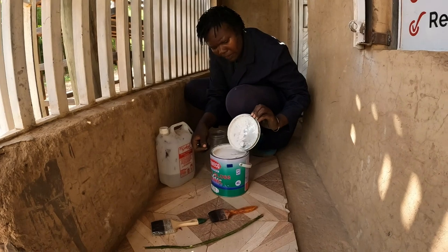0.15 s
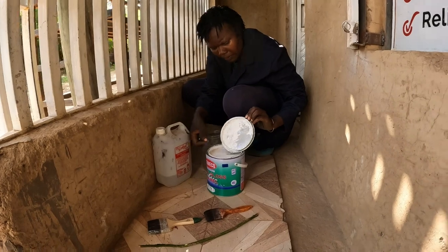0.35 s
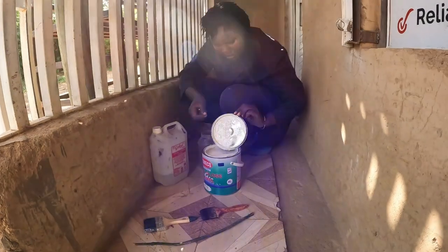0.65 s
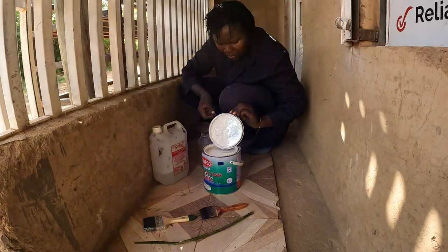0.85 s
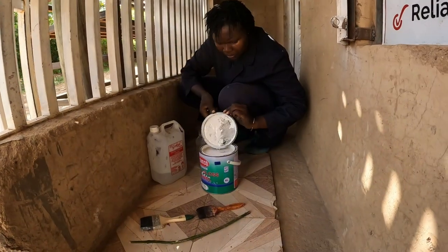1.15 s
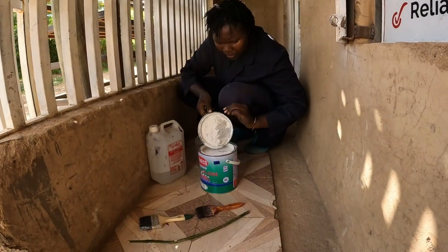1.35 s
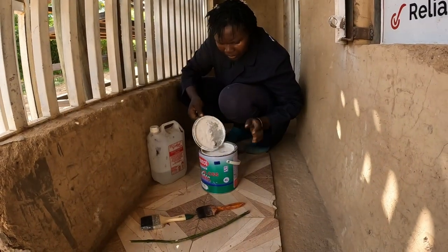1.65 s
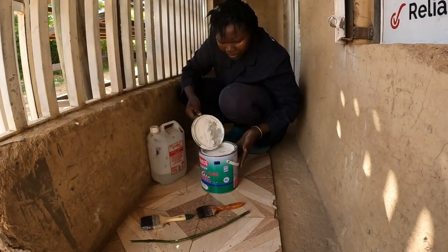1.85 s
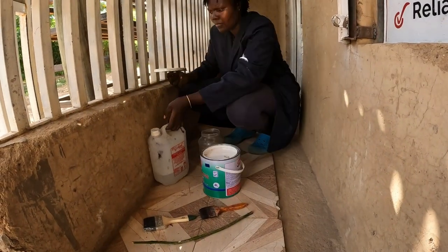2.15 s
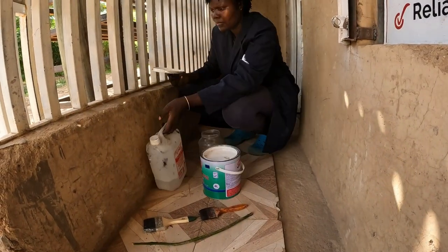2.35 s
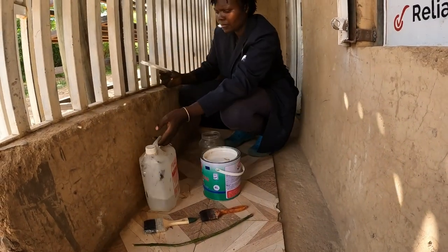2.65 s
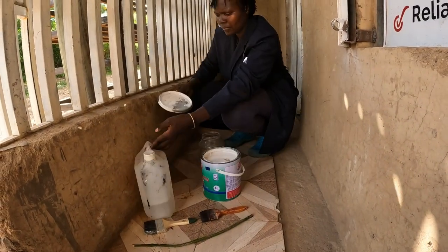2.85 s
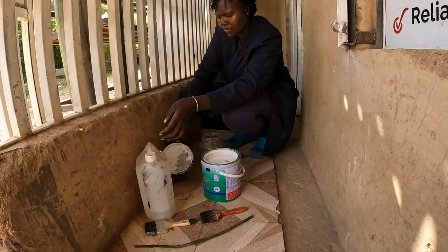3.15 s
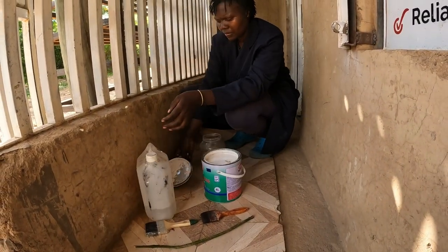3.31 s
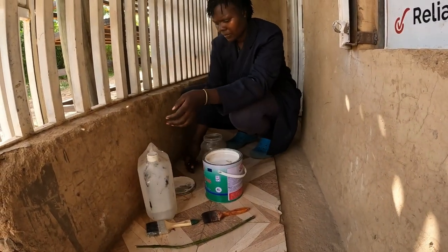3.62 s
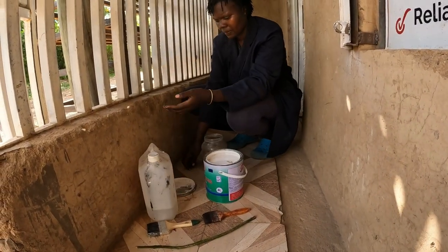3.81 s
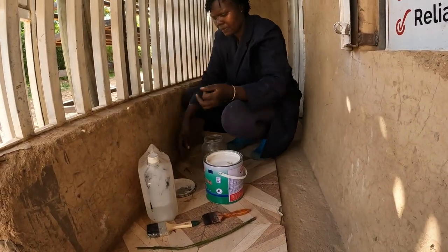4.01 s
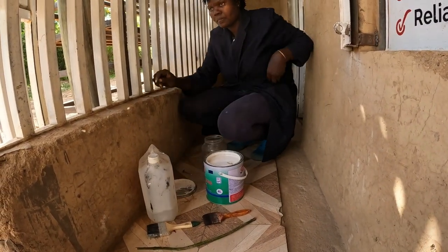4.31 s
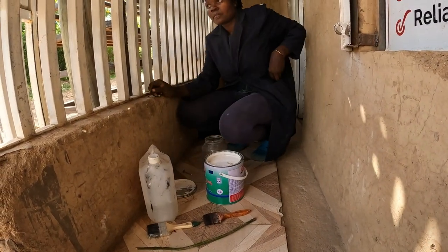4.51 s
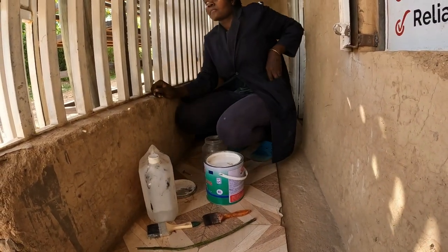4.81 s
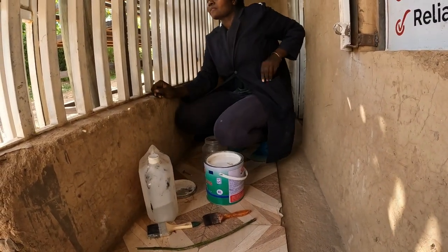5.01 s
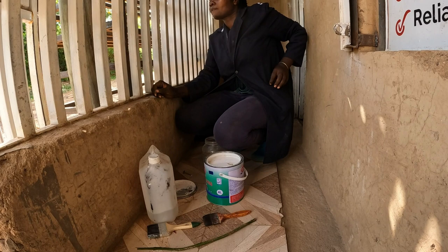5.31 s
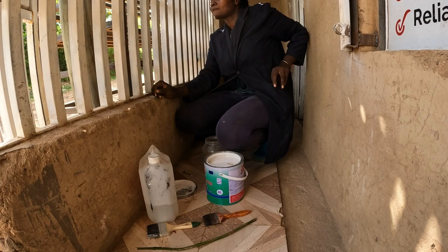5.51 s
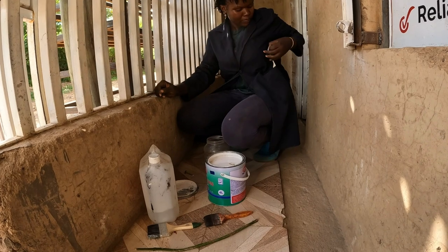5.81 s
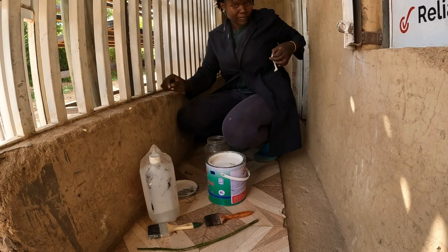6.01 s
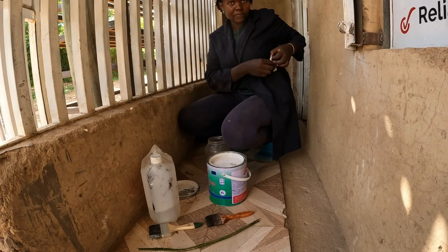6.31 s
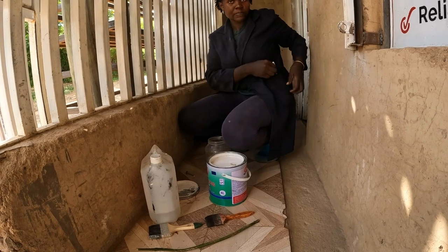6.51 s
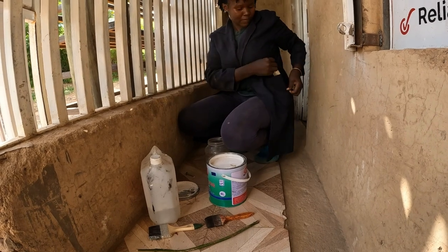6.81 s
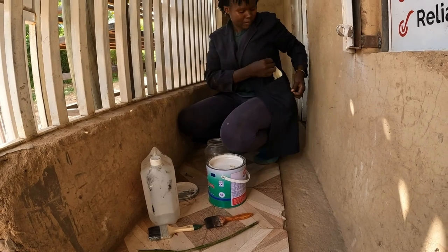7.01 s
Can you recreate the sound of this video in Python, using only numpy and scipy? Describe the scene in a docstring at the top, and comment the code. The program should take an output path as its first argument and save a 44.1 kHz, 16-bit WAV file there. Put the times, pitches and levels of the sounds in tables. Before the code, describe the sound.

Over a low, throbbing engine idle outside, a thin metal lid rings against its tin, with finger rubs and light ticks, and comes away in sharp clanks. A part-filled plastic container skids and booms, the lid drops with a ringing rattle, and bangles tinkle. The later part is quieter: cloth swishes, small knocks and creaks, faint birds. Close pickup, short semi-open room tail.

```python
"""A paint tin's metal lid clangs free close to the microphones on a narrow veranda, later clattering on the floor:
each blow is damped modes plus noise bursts. Between, a plastic jerrycan drags in stick-slip bursts and booms.
Bangles clink as paired sine modes; fingers and clothes rustle as swelling, grainy noise.
Outside, an engine idles as low harmonics and rumble, birds whistle in gliding tones,
an insect trills in narrow-band noise, and a soft wash of distant sound lies behind."""
import sys
import numpy as np
from scipy import signal
from scipy.fft import rfft, irfft, next_fast_len
from scipy.io import wavfile

SR = 44100
rng = np.random.default_rng(int(sys.argv[2]) if len(sys.argv) > 2 else 0)


def wav_out(sig):
    """Save sig, one row per channel (or a flat mono array), as 16-bit PCM at SR to the path in sys.argv[1]."""
    wavfile.write(sys.argv[1], SR, np.round(np.clip(np.atleast_2d(sig).T, -1, 1) * 32767).astype(np.int16))


N = 315742
T = np.arange(N) / SR
AGE = T[:SR * 3 // 4]  # time since the onset of a short sound, s

# Two close microphone ports.
# likeness of the ports: (f/Hz, correlation/1)
PORT_LIKENESS = [(100, 1), (250, .997), (500, .96), (1000, .9), (2400, .78), (6000, .8), (14000, .6)]
# left against right: (f/Hz, level/dB)
PORT_LEAN = [(60, 0.0), (130, 0.0), (290, 0.5), (640, 1.0), (1410, 0.5), (3100, -0.5), (6820, 0.5),
             (15000, 3.5)]
# left against right: (f/Hz, phase/rad)
PORT_LEAD = [(60, 0), (250, -.08), (550, -.3), (1100, -.5), (2070, -.6), (3000, -.35), (4300, -.5),
             (6000, -.2), (11500, 0)]
EDGE_HZ = 15600  # upper band limit
# air moving at the ports: (f/Hz, level/dB)
DRAUGHT = [(12, 0), (30, -2), (60, -9), (120, -17), (300, -34), (1000, -70)]
DRAUGHT_DB = -57

# Outside, beyond the veranda.
# distant wash: (f/Hz, level/dB)
AIR = [(100, 9), (170, 10.5), (260, 0.5), (350, 1.5), (450, -5), (600, -8.5), (800, -12), (1080, -6),
       (1600, -11.5), (2500, -18), (4100, -20), (5200, -18), (7400, -26.5), (9000, -34), (12000, -35),
       (15500, -54)]
WASH_DB, LULL_S, LULL_LENGTH_S, LULL_DB = -39.8, 6.25, 1.5, -5.5  # lull: peak time, length, change
# idling engine: (t/s, rate/firings per s)
ENGINE_SPEED = [(0, 15.3), (.8, 15.9), (1.25, 15.3), (2.1, 17.5), (2.4, 16.9), (2.75, 14.9), (3.45, 16.5),
                (4.35, 17.6), (5.1, 16.95), (5.6, 16.9), (6.85, 18.1), (7.16, 17.6)]
# its throb: (t/s, level/dB)
THROB = [(0, -31), (.25, -28), (.9, -27), (1.7, -26), (2.0, -34), (2.4, -25), (2.8, -24), (3.1, -27.5),
         (3.45, -26), (4.1, -29), (5.05, -23.5), (6.05, -33.5), (6.85, -29), (7.16, -30)]
# its low orders: (multiple of the firing rate/1, level/dB)
ENGINE_ORDERS = [(2, -4), (3, -16), (4, -1), (6, 0), (7, -17), (8, -19), (10, -17)]
# rumble between the orders: (f/Hz, level/dB)
RUMBLE = [(15, -18), (30, -14), (45, -13), (60, -3), (80, 0), (100, -2), (120, -16), (200, -26), (500, -60),
          (3000, -100)]
BOOM_DB, BOOM_HZ, BOOM_WIDTH_HZ = 3.5, 84.5, 9  # the exhaust's strongest order crosses a resonance
SETTLES_S, SETTLING_S = 2.4, 1.1  # midpoint and duration of the engine settling
UNEVEN_DB, SETTLED_DB = -2, -6.5  # rumble before and after
RAGGED_DB, SMOOTH_DB = -6, -4.5  # orders before and after
# insect's narrow band: (f/Hz, level/dB)
TRILL_BAND = [(8000, -50), (9300, -8), (9650, 0), (10000, -7), (11000, -50)]
TRILL_S, TRILL_LENGTH_S, TRILL_DB = 2.5, 2.1, -61  # peak time, length, level
# rising bird whistles: (t/s, length/s, start f/Hz, level/dB)
WHISTLES = [(2.39, .12, 6150, -49), (2.61, .1, 7100, -53), (3.11, .12, 6700, -54), (4.75, .11, 10000, -59),
            (5.63, .26, 6100, -54), (6.21, .11, 7200, -63)]
RISE_HZ_PER_S = 7000
# second bird's runs: (t/s, chips/count, level/dB)
CHIP_RUNS = [(4.8, 1, -52), (6.005, 3, -55), (6.295, 3, -56), (7.07, 2, -55)]
CHIP_S, CHIP_SPACING_S = .052, .052  # length, and time from onset to onset
CHIP_HZ, CHIP_FALL_HZ = 5480, 400
# one held whistle: (t/s, length/s, start f/Hz, end f/Hz, level/dB)
LONG_NOTE = (5.87, .46, 2110, 2095, -56)

# Near the microphones.
# rubbed cloth: (f/Hz, level/dB)
CLOTH = [(200, -8), (700, -6), (1400, 1), (2400, -4), (4000, -3), (5500, 0), (7800, -3), (9200, -8),
         (11500, -13), (15000, -26)]
# cloth shifting with the body: (t/s at the fastest point, length/s, level/dB)
SHIFTS = [(3.24, .36, -48.5), (4.425, .055, -35), (4.66, .26, -50.5), (4.905, .09, -44.5),
          (4.997, .045, -42), (5.25, .16, -56), (5.5, .12, -55), (5.73, .13, -50), (6.04, .2, -53),
          (6.46, .1, -54), (6.62, .06, -49), (6.745, .07, -46), (6.9, .06, -45), (7.03, .07, -52)]
# fingers sliding over the lid: (t/s at the fastest point, length/s, level/dB)
SLIDES = [(.06, .17, -37), (.225, .06, -40), (.3, .1, -46), (.54, .16, -47.5), (.69, .15, -43),
          (.945, .1, -37), (1.07, .14, -48), (1.3, .08, -37), (1.405, .07, -34), (1.63, .2, -54),
          (2.18, .05, -43)]
SHIFT_TILT_DB, SLIDE_TILT_DB = -.9, .5  # per octave: the fingers are brighter than the clothes
STIR_DB, STIR_SWAY_DB = -67, 3  # cloth never quite comes to rest
# dull knocks and creaks as weight shifts: (t/s, level/dB, time to fall 20 dB/s)
KNOCKS = [(4.728, -21, .011), (4.751, -25, .012), (4.781, -30, .014), (4.809, -30, .01), (4.817, -32, .016),
          (6.597, -39, .12), (6.706, -37, .1), (6.899, -29.5, .022)]
# their spectrum: (f/Hz, level/dB)
KNOCK = [(200, -14), (500, -13), (750, -9), (1020, 2), (1400, -9), (2300, -20), (3600, -18), (6000, -30),
         (14000, -50)]
# small ticks of handling: (t/s, level/dB, tilt/dB per octave, time to fall 20 dB/s)
TICKS = [(0.1, -32, 1, .015), (0.225, -33, 5, .03), (0.991, -25, 1, .014), (1.026, -36, -1, .008),
         (1.126, -24, 0, .012), (1.202, -26.5, -1, .012), (4.107, -35, 0, .01), (4.406, -33, -1, .04),
         (4.728, -33, -3, .01), (6.487, -48, 2, .012)]
# bangle blows: (t/s, ring level/dB, tick level/dB, second ring against the first/dB)
CLINKS = [(3.938, -26, -28, -12), (4.002, -32, -18, 1), (4.088, -31.5, -19, 10.5), (4.137, -37, -26, 8),
          (4.157, -41, -38, 10)]
# modes of each of two bangles: (f/Hz, level/dB, t60/s)
BANGLES = [
    [(4200, 0, .18), (6780, 0, .08), (8340, -7, .15), (13380, -13, .08)],
    [(4150, -12, .1), (6900, -14, .13), (7900, 0, .07), (8010, -5, .11), (13600, -14, .09)],
]
# pulls on the jerrycan: (t/s at the fastest point, length/s, level/dB)
PULLS = [(2.57, .11, -35), (2.74, .05, -22), (2.88, .14, -20)]
# jerrycan catching and skidding: (t/s, boom level/dB, grit level/dB, grit time to fall 20 dB/s)
SKIDS = [(2.511, -27, -18, .035), (2.544, -28, -26, .04), (2.56, -28, -27, .04), (2.592, -27, -33, .05),
         (2.616, -30, -31, .04), (2.703, -21, -30, .04), (2.711, -9, -8.5, .045), (2.733, -14, -13, .04),
         (2.76, -21, -25, .07), (2.794, -20, -22, .075), (2.836, -20, -18.5, .06), (2.884, -10, -17, .08),
         (2.914, -11.5, -12, .055), (2.93, -13, -21, .05), (2.968, -24, -25, .035), (2.994, -26, -25, .025)]
# its hollow plastic body: (f/Hz, level/dB, t60/s)
CAN_MODES = [(146, -6, .2), (180, -10, .15), (212, -6, .15), (243, -8, .12), (270, 0, .15), (295, -4, .15),
             (335, -8, .13), (410, -12, .1), (555, -10, .12)]
# plastic slipping on grit: (f/Hz, level/dB)
GRIT = [(70, -6), (110, 6), (160, 8), (300, 9), (420, 1), (560, 4), (750, -3), (1300, 0), (1900, -6),
        (4500, -7), (8000, -11), (12000, -20.5), (15000, -38)]
# lid rim sliding over the tin: (t/s at the fastest point, length/s, level/dB)
SCRAPES = [(.25, .14, -38), (.68, .5, -47), (1.04, .12, -43), (1.32, .5, -48)]
# struck sheet metal, buzzing: (f/Hz, level/dB)
CLATTER = [(200, -26), (500, -19), (820, -15), (1100, -1), (1600, 0), (2100, -4), (2550, -2), (3200, -7),
           (4200, -6), (7000, -13), (11000, -26), (15000, -43)]
# its first sharp contact: (f/Hz, level/dB)
CRACK = [(200, -14), (700, -8), (1300, 0), (3000, -4), (7500, -5), (11000, -15), (15000, -30)]
# its hollow thump: (f/Hz, level/dB)
THUMP = [(50, -20), (110, -4), (220, 0), (290, -3), (400, -20), (900, -40), (4000, -80)]
# loose lid on the floor: (t/s, ring level/dB, clatter level/dB, brightness/dB per octave,
# base time to fall 20 dB/s, crack level/dB, thump level/dB)
LID_HITS = [(3.5, -17, -24, -3.5, .225, -8, -28), (3.602, -34, -20, 5, .07, -27, -50),
            (3.662, -29, -13, 1.5, .08, -10, -42), (3.706, -28, -15.5, .8, .12, -24, -50)]
# its modes before brightening: (f/Hz, level/dB)
LID_MODES = [(662, -8), (759, -9), (791, -9), (899, -9), (1063, -7), (1133, -7), (1182, -7), (1219, 2),
             (1553, -5), (1868, -6), (2417, -10), (2972, -9), (3558, -10), (3615, -13), (3768, -12),
             (3900, -13), (4094, -12), (4266, -9), (4309, -13), (4616, -15), (5214, -14), (5284, -16)]
# lid against tin: (t/s, ring level/dB, clatter level/dB, brightness/dB per octave,
# base time to fall 20 dB/s, crack level/dB, thump level/dB)
TIN_HITS = [(0.0, -16, -16, -4.2, .135, -18, -28), (0.185, -42, -35, 4, .12, -45, -45),
            (0.992, -35, -43, -5, .15, -40, -31), (1.732, -18, -11.5, 1.7, .155, -11, -15),
            (1.947, -14, -16, -.6, .155, -12, -23), (2.119, -25, -15.5, 1.3, .014, -22, -38),
            (2.168, -46, -37, 0, .08, -60, -48), (2.272, -38, -45, -3, .04, -52, -34)]
# its modes before brightening: (f/Hz, level/dB)
TIN_MODES = [(665, -16), (848, -14), (899, -12), (1036, -5), (1069, -11), (1120, -9), (1249, -10),
             (1480, -11), (1513, -1), (1593, -4), (1628, -9), (1723, -6), (1771, -11), (2008, -12),
             (2398, -12), (2514, -13), (3147, -13), (3561, -9), (3679, -16), (3733, -15), (3959, -15),
             (3994, -15), (4046, -14), (4210, -16), (4261, -16), (4546, -14), (5192, -18), (5262, -19),
             (5631, -16), (5693, -19)]


def amp(db):
    """Decibels to gain."""
    return 10 ** (np.asarray(db) / 20)


def unit(x):
    """Scales to rms 1."""
    return x / np.sqrt(np.mean(x ** 2) + 1e-20)


def read(points, hz):
    """A spectrum table on a log-frequency axis."""
    f, value = np.transpose(points)
    return np.interp(np.log(hz + 1), np.log(f), value)


def curves(rows):
    """Each column of a time table, sample by sample."""
    s, *columns = np.transpose(rows)
    return [np.interp(T, s, c) for c in columns]


def add(mix, s, sound):
    """Lays a sound into the mix at time s."""
    part = mix[max(round(s * SR), 0):][:len(sound)]
    part += sound[:len(part)]


def drift(rate):
    """Random wander of rms 1 with rate new values a second, joined by straight lines."""
    knots = rng.standard_normal(N // 16)
    return unit(np.interp(T * rate, np.arange(len(knots)), knots))


def colour(x, spectrum):
    """Filters x by a spectrum, at rms 1."""
    size = next_fast_len(len(x))
    gain = amp(read(spectrum, np.fft.rfftfreq(size, 1 / SR)))
    return unit(irfft(rfft(x, size) * gain, size)[:len(x)])


def swells(rows, attack=.45, shape=2.0):
    """Gestures gather speed, peak and slow; attack is the rising share, a high shape holds longer."""
    attack, power = np.clip(attack, .05, .95), 0
    for s, length, db in rows:
        away = abs(T - s) / (length * np.where(T < s, attack, 1 - attack))
        power = power + amp(db) ** 2 * .5 ** (2 * np.minimum(away ** shape, 20))
    return np.sqrt(power)


def dying(length, hold=1, rise=.0005):
    """Envelope that falls 20 dB in length s; hold over 1 sustains it first, as a rattle does."""
    fall = amp(-20 * np.minimum((AGE / length) ** hold, 8))
    return fall * (1 - np.exp(-AGE / rise))


def ripple(hz, depth_db, width_hz=22):
    """Random peaks and gaps along the frequency axis, as crowded resonances make them."""
    knots = np.clip(rng.standard_normal(len(AGE)), -2, 2)
    return amp(depth_db * np.interp(hz / width_hz, np.arange(len(knots)), knots))


def burst(spectrum, length, tilt_db=0, hold=1, damping=0, rise=.0005, grain_db=0, ripple_db=0):
    """A crowd of modes too dense to count, in octave bands; damping makes the high ones die first."""
    hz, out = np.fft.rfftfreq(len(AGE), 1 / SR), 0
    octave = np.log2(np.clip(hz, 125, 16000) / 1000)
    shape = amp(read(spectrum, hz) + tilt_db * octave) * ripple(hz, ripple_db)
    phases = np.exp(2j * np.pi * rng.random(len(hz)))
    z = rfft(unit(irfft(shape * phases, len(AGE))))
    for k in range(-3, 5):  # octaves from 1 kHz, overlapping
        band = irfft(z * np.maximum(1 - abs(octave - k), 0), len(AGE))
        band_length = length * 2 ** (-damping * max(k - 1, 0))
        out = out + band * dying(band_length, hold, rise)
    return out * unit(amp(grain_db * drift(350)[:len(AGE)]))


def ring(modes, spread=0):
    """Damped sines of total starting power 1; spread detunes them from blow to blow."""
    hz, db, t60 = np.transpose(modes)[:, :, None]
    phase, detune = rng.uniform(-1, 1, (2, len(modes), 1))
    waves = np.sin(2 * np.pi * hz * (1 + spread * detune) * AGE + np.pi * phase)
    return (amp(db - 60 * AGE / t60) * waves).sum(0) / np.sqrt((amp(db) ** 2).sum() / 2)


def draught():
    """Moving air rumbles faintly and separately at each microphone port."""
    return amp(DRAUGHT_DB) * np.array([colour(noise, DRAUGHT) for noise in rng.standard_normal((2, N))])


def outdoors():
    """A soft wash of distant sound that sinks for a while."""
    lull = swells([(LULL_S, LULL_LENGTH_S, 0)], attack=.58, shape=1.3)
    level_db = WASH_DB + LULL_DB * lull + .8 * drift(7)
    return amp(level_db) * colour(rng.standard_normal(N), AIR)


def engine():
    """Only the low orders of the exhaust arrive; uneven firing smears a rumble between them."""
    (rate,), (level_db,) = curves(ENGINE_SPEED), curves(THROB)
    settled = np.clip(.5 + (T - SETTLES_S) / SETTLING_S, 0, 1)
    turns = np.cumsum(rate * (1 + .009 * drift(12))) / SR
    orders = unit(sum(amp(db + 2.5 * drift(4)) * np.cos(2 * np.pi * k * turns) for k, db in ENGINE_ORDERS))
    resonance = 1 / np.hypot(1, 2 * (5 * rate - BOOM_HZ) / BOOM_WIDTH_HZ)
    boom = unit(np.cos(2 * np.pi * 5 * turns)) * resonance  # the fifth order
    tones_db = RAGGED_DB + (SMOOTH_DB - RAGGED_DB) * settled
    tones = amp(tones_db) * (orders + amp(BOOM_DB) * boom)
    rumble_db = UNEVEN_DB + (SETTLED_DB - UNEVEN_DB) * settled
    rumble = amp(rumble_db) * colour(rng.standard_normal(N), RUMBLE)
    return amp(level_db) * (tones + rumble)


def insect():
    """A thin, far trill in one narrow band starts quickly and fades slowly."""
    level = swells([(TRILL_S, TRILL_LENGTH_S, TRILL_DB)], attack=.13, shape=2.2)
    return level * amp(3 * drift(25)) * colour(rng.standard_normal(N), TRILL_BAND)


def whistle(length, start_hz, end_hz, db, waver, flutter_db):
    """One thin, gliding sine whose pitch wavers and level flutters."""
    size = int(length * SR)
    hz = np.linspace(start_hz, end_hz, size) * (1 + waver * drift(600)[:size])
    level = amp(db + flutter_db * drift(70)[:size]) * signal.windows.tukey(size, .6)
    return level * np.sin(2 * np.pi * np.cumsum(hz) / SR)


def birds():
    """One bird whistles upwards, one chips in short runs, one holds a low note: all gliding sines."""
    out = np.zeros(N)
    for s, length, hz, db in WHISTLES:
        add(out, s, whistle(length, hz, hz + RISE_HZ_PER_S * length, db, waver=.014, flutter_db=3))
    for s, chips, db in CHIP_RUNS:
        for k in range(round(chips)):
            chip = whistle(CHIP_S, CHIP_HZ, CHIP_HZ - CHIP_FALL_HZ, db, waver=.02, flutter_db=3)
            add(out, s + k * CHIP_SPACING_S, chip)
    add(out, LONG_NOTE[0], whistle(*LONG_NOTE[1:], waver=.004, flutter_db=1.2))
    return out


def fibres(tilt_db):
    """Fibres catch and let go in fine clumps."""
    spectrum = [(hz, db + tilt_db * np.log2(hz / 3000)) for hz, db in CLOTH]
    clumps = amp(3 * drift(1500) + 1.5 * drift(90))
    return colour(rng.standard_normal(N) * clumps, spectrum)


def rustle():
    """Each stroke of the fingers or the clothes swells and fades with its speed."""
    stir = amp(STIR_DB + STIR_SWAY_DB * drift(12))
    cloth = np.hypot(swells(SHIFTS, attack=.46, shape=1.8), stir)
    fingers = swells(SLIDES, attack=.52, shape=1.9)
    return fingers * fibres(SLIDE_TILT_DB) + cloth * fibres(SHIFT_TILT_DB)


def knocks_and_ticks():
    """Fingers tick on the rim and something creaks and knocks: short bursts of dense modes."""
    out = np.zeros(N)
    for s, db, tilt_db, length in TICKS:
        add(out, s, amp(db) * burst(CRACK, length, tilt_db, hold=1.4, rise=.001))
    for s, db, length in KNOCKS:
        add(out, s, amp(db) * burst(KNOCK, length, hold=1.2, rise=.001))
    return out


def bangles():
    """Two bangles strike each other and ring on their own modes."""
    out = np.zeros(N)
    for s, ring_db, tick_db, second_db in CLINKS:
        rings = ring(BANGLES[0], spread=.004) + amp(second_db) * ring(BANGLES[1], spread=.004)
        chatter = unit(amp(1.6 * drift(200)[:len(AGE)]))  # they keep touching as they ring
        onset = 1 - np.exp(-AGE / .001)
        add(out, s, amp(ring_db) * rings * chatter * onset)
        add(out, s, amp(tick_db) * burst(CLATTER, .02, tilt_db=-.5, rise=.001))
    return out


def jerrycan():
    """The base drags, sticks and slips on grit; every slip booms in the flexing plastic walls."""
    # sliding is softer than slipping
    dull = [(hz, db - 2.5 * max(np.log2(hz / 600), 0)) for hz, db in GRIT]
    sliding = colour(rng.standard_normal(N) * amp(3 * drift(400)), dull)
    out = swells(PULLS, attack=.55, shape=2.3) * sliding
    for s, boom_db, grit_db, length in SKIDS:
        boom = ring(CAN_MODES, spread=.05) * (1 - np.exp(-AGE / .003))
        grit = burst(GRIT, length, hold=1.3, damping=.1, rise=.001, grain_db=2.5, ripple_db=4.5)
        add(out, s, amp(boom_db) * boom)
        add(out, s, amp(grit_db) * grit)
    return out


def scraping():
    """The sliding rim keeps the modes of the tin softly alive."""
    body = ring([(hz, .4 * db, .2) for hz, db in TIN_MODES], spread=.01)
    friction = rng.standard_normal(N) * amp(4 * drift(120))
    return swells(SCRAPES, attack=.42, shape=2.2) * unit(signal.oaconvolve(friction, body)[:N])


def metal(hits, modes, free_t60, hold, damping, ring_length, rise, rattle_db, stilling_db):
    """Each blow cracks, thumps the hollow and leaves the sheet ringing and buzzing until it is stilled."""
    out = np.zeros(N)
    for s, ring_db, clatter_db, tilt_db, length, crack_db, thump_db in hits:
        # new contact checks the earlier sound within 12 ms
        out = out * amp(stilling_db * np.clip((T - s) / .012, 0, 1))
        # free_t60 holds at 1 kHz; higher modes die sooner
        struck = [(hz, db + tilt_db * max(np.log2(hz / 1200), 0), free_t60 * np.sqrt(1000 / hz))
                  for hz, db in modes]
        tone = ring(struck, spread=.001) * dying(length * ring_length, hold, rise)
        clatter = burst(CLATTER, length, tilt_db, hold, damping, rise, rattle_db, ripple_db=5)
        add(out, s, amp(ring_db) * tone)
        add(out, s, amp(clatter_db) * clatter)
        add(out, s, amp(crack_db) * burst(CRACK, .012, rise=.001))
        add(out, s, amp(thump_db) * burst(THUMP, .045, hold=1.3, rise=.002))
    return out


def floor_lid():
    """The loose lid clatters onto the floor; each new contact stills it only slightly."""
    return metal(LID_HITS, LID_MODES, free_t60=1.5, hold=1.3, damping=.15, ring_length=1.2,
                 rise=.002, rattle_db=2.2, stilling_db=-2)


def paint_tin():
    """The lid clangs against the tin; each new contact strongly checks the earlier ring."""
    return metal(TIN_HITS, TIN_MODES, free_t60=2.4, hold=1.3, damping=.2, ring_length=1.45,
                 rise=.003, rattle_db=1.2, stilling_db=-10)


def veranda(x, wet_db=-15, t60=.3):
    """Close walls, open on one side: a short, thin tail of decaying noise."""
    tail = rng.standard_normal(len(AGE)) * amp(-60 * AGE / t60) * (AGE > .004)
    return x + amp(wet_db) * signal.oaconvolve(x, tail / np.linalg.norm(tail))[:N]


def ports(x):
    """Two close microphone ports: alike in the bass, parted by phase and scattering in the treble."""
    size = next_fast_len(N + SR)
    hz, z = np.fft.rfftfreq(size, 1 / SR), rfft(x, size)
    scatter = rng.standard_normal(len(AGE)) * dying(.06)
    other = rfft(scatter / np.linalg.norm(scatter), size)
    same = np.clip(read(PORT_LIKENESS, hz), 0, 1)
    shared, apart = np.sqrt((1 + same) / 2), np.sqrt((1 - same) / 2) * other
    # half of each difference goes to either port
    lean = amp(read(PORT_LEAN, hz) / 2) * np.exp(.5j * read(PORT_LEAD, hz))
    return irfft([z * (shared + apart) * lean, z * (shared - apart) / lean], size)[:, :N]


def scene():
    """Handling noises on the veranda over the sounds from outside."""
    outside = outdoors() + engine() + insect() + birds()
    handling = rustle() + knocks_and_ticks() + bangles() + jerrycan()
    lid_and_tin = scraping() + floor_lid() + paint_tin()
    near = veranda(handling + lid_and_tin)
    return ports(near + outside) + draught()


def record(dry):
    """Peaks clip at full scale; then the band limit."""
    low_pass = signal.firwin(301, EDGE_HZ, window=("kaiser", 9), fs=SR)
    return signal.oaconvolve(np.clip(dry, -1, 1), low_pass[None], "same")


dry = scene()
out = record(dry)
wav_out(out)
```